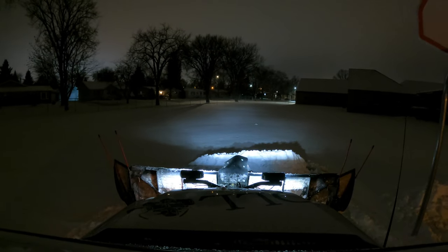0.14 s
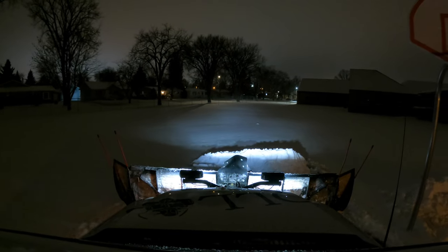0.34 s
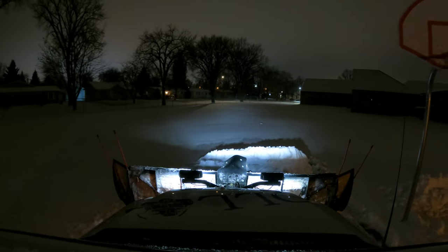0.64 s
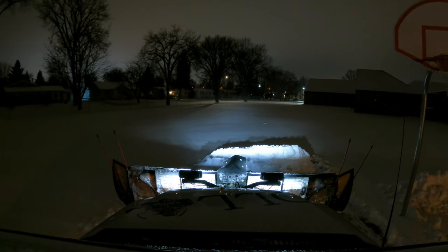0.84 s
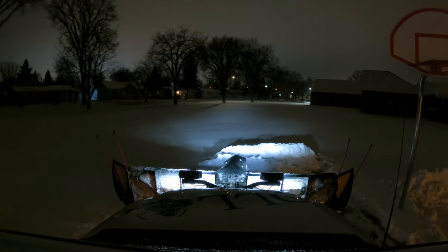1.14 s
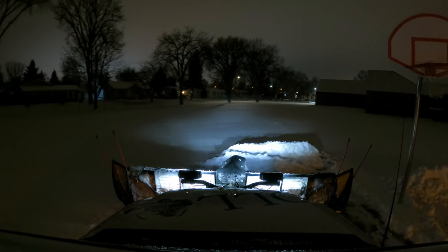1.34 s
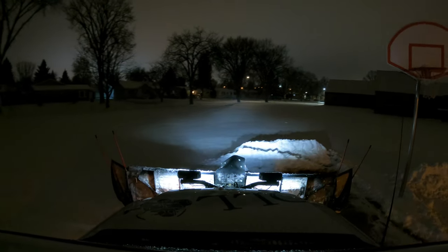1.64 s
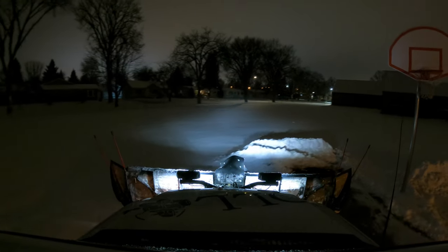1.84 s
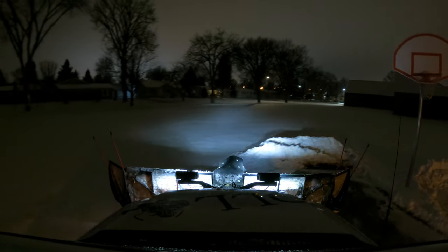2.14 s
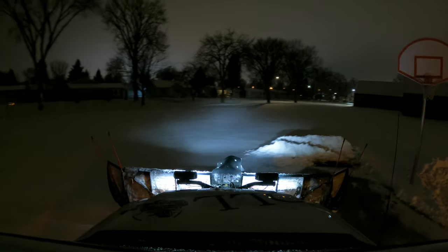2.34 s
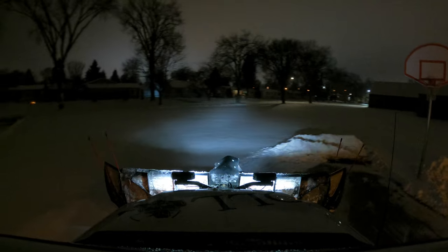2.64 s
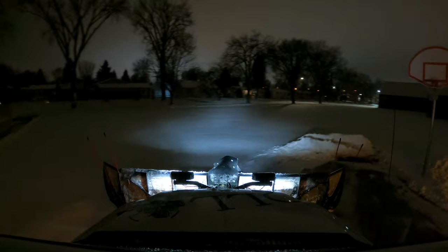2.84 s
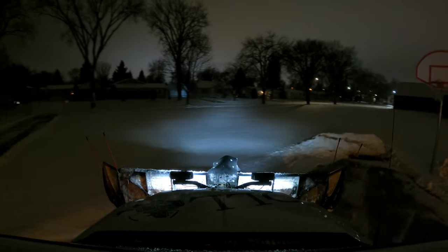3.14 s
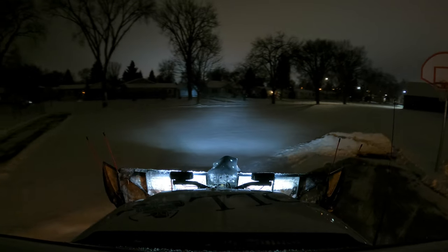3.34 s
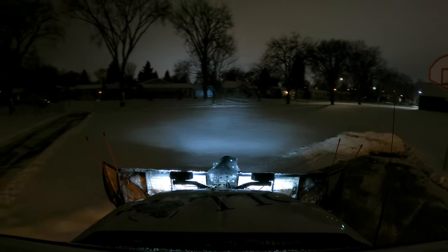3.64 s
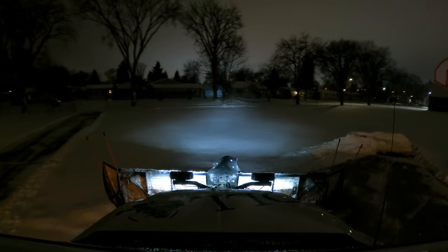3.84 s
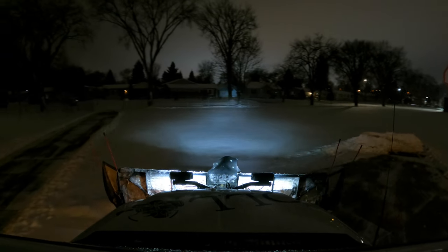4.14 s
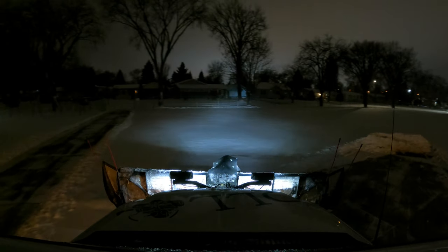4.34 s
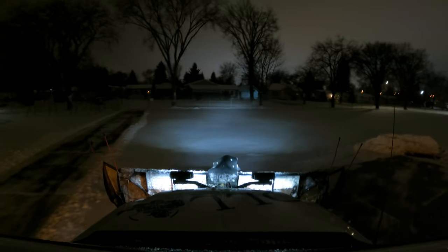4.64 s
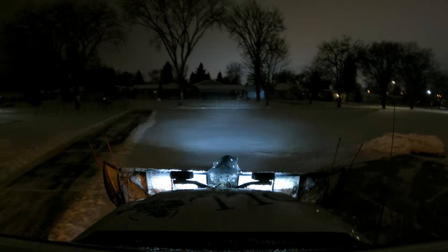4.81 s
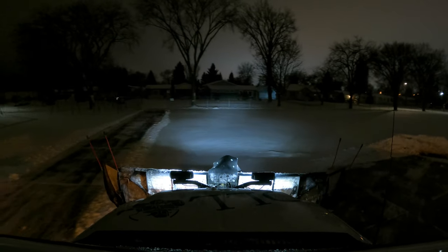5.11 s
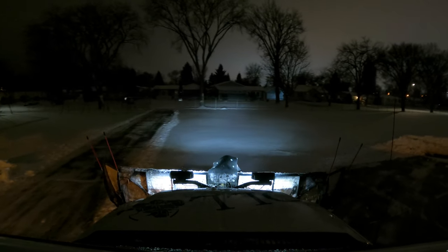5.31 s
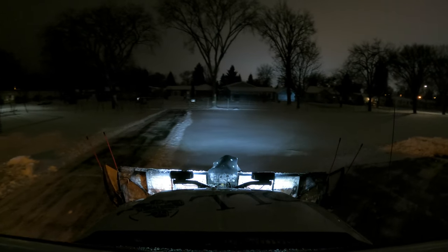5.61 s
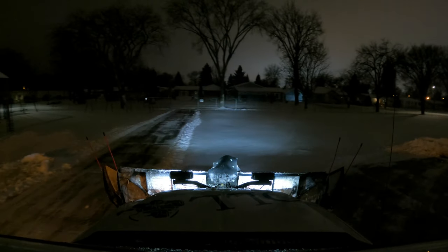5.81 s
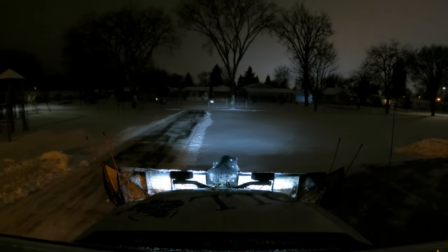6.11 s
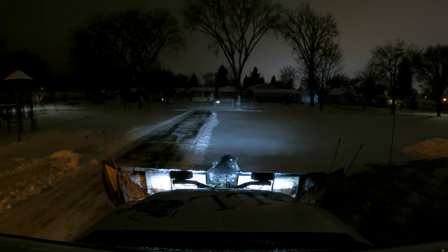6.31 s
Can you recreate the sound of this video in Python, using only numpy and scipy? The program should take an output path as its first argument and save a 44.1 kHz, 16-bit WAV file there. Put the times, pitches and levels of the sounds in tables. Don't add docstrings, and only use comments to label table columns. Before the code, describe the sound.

Close on the cab roof of a V8 diesel pickup plowing an open snowy lot, a deep exhaust boom and rough, uneven clatter run throughout. A thin turbo whistle climbs with the revs, peaks near two seconds and sinks away. The engine then slows and lurches, with thuds through the frame, a revving surge around five seconds, and a last dip and pickup. Soft hiss of snow and air fills the gaps.

```python
import sys
import numpy as np
from scipy import signal
from scipy.fft import rfft, irfft, next_fast_len
from scipy.io import wavfile

SR = 44100
rng = np.random.default_rng(int(sys.argv[2]) if len(sys.argv) > 2 else 0)


def natural_amplitude(level_db):
    exponent = np.asarray(level_db, float) / 20
    return 10 ** exponent


def output_pcm(signal):
    pcm = np.clip(np.atleast_2d(signal).T, -1, 1) * 32767
    wavfile.write(sys.argv[1], SR, np.round(pcm).astype(np.int16))


N = 285327
HZ = np.fft.rfftfreq(next_fast_len(N, True), 1 / SR) + 1e-3

# (frequency [Hz], width [Hz], level over the base [dB])
PIPE_MODES = [(41.8, 4.6, 5), (45.44, 1.33, -11), (54.3, 30.4, 21.5), (93.3, 15.6, 6), (122.8, 15.3, 16),
              (171.4, 10, 8), (226.4, 5.6, 8.5), (267, 36, -4.5)]
ORDER_LEVELS = [0.0, 2, -4.5, -5]
ORDER_LEADS = [0.07, 1.76, 1.36, 0.89]
# (frequency [Hz], level [dB per Hz])
CAB_SPECTRUM = [(8, -43), (18, -14), (26, -3), (40, -10.5), (70, -0.5), (110, 0), (150, -6), (200, -6),
                (225, -10.5), (255, -33), (330, -65.5)]
# (frequency [Hz], width [Hz], level [dB])
CAB_MODES = [(92.5, 5.8, -12.5), (187, 180, 4), (190, 6.4, 3.5),
             (54, 14, 8), (126.8, 16.4, 3)]


def exhaust(rate, firings, effort_db):
    turn = 2 * np.pi * (firings - .15)
    first_db, upper_db, rumble_swell_db = swells_and_lulls()
    orders = 0
    for order, (order_db, lead) in enumerate(zip(ORDER_LEVELS, ORDER_LEADS), 1):
        humps_db = sum(db / (1 + (2 * (order * rate - hz) / width) ** 2) for hz, width, db in PIPE_MODES)
        swell_db = upper_db if order > 1 else first_db
        orders = orders + natural_amplitude(order_db + humps_db + swell_db) * np.sin(order * turn + lead)
    orders = orders * natural_amplitude(-40.5 + 0.27 * effort_db)
    rumble_db = rumble_swell_db - 29 + 0.3 * effort_db + 0.06 * (rate - rate.mean())
    cab_gain = colour(CAB_SPECTRUM, CAB_MODES)
    mid, side = rms_one(filtered(rng.standard_normal((2, N)), cab_gain))
    return np.sqrt(2) * orders + natural_amplitude(rumble_db) * (mid + natural_amplitude(-26.0) * side * [[1], [-1]])


# (time [s], length [s], first order [dB], upper orders [dB], rumble [dB])
SWELLS_AND_LULLS = [(0.62, 0.57, 2, 2, 2.5), (1.623, 0.28, -1.5, -13.5, 3.5), (2.154, 0.15, -5.5, -5.5, 2),
                    (2.41, 0.45, 3, 3.5, 5), (2.495, 0.064, -2, 1, -5), (1.75, 0.14, -0.5, 13.5, 1.5),
                    (1.185, 0.53, -0.5, 1, 1), (3.44, 0.3, 2, 3.5, 1.5), (3.814, 0.27, 3, -5.5, 2),
                    (4.08, 0.075, -22, -4, -2), (4.236, 0.076, 2.5, -11, 1.5), (4.45, 0.48, -3, -7.5, 0.5),
                    (4.9, 0.094, -2, 3, 0.5), (5.79, 0.063, -4, -7.5, -17.5), (6.24, 0.16, 4, 7, -3.5),
                    (6.47, 0.15, -10.5, -22, 6.5), (0.13, 0.19, 0.5, 1, 0), (2.04, .1, 3.5, 4, -0.5),
                    (3.2, 0.062, -4.5, 1.5, 3), (4.42, 0.3, -3, 4.5, -2.5), (5.27, 0.34, 0.5, -5, 4),
                    (6.37, 0.079, 14, -8, 4), (1.52, 0.083, 1.5, 2.5, 0.5), (4.0, .1, 4, 2, 2.5),
                    (4.97, .1, 4.5, -3, 1.5), (3.87, 0.083, -1, 0, -4.5), (5.2, 0.088, 0, 3, 1),
                    (4.1, .1, 3, -6, -2.5)]


def swells_and_lulls():
    t = np.arange(N) / SR
    return sum(np.outer(db, np.exp(-(2 * (t - s) / length) ** 2 / 2)) for s, length, *db in SWELLS_AND_LULLS)


# (head [dB], sump [dB], covers [dB], block [dB], injector [dB])
CYLINDER_KNOCK = [(1, 9.5, 0, 12, 17), (4.7, 6, -1, 5, 17), (7, 9.5, -6, 7.5, 10), (1.5, -1, -1, 9, 18),
                  (-11, -25, -4.5, 8.5, 12.5), (-4.5, -33, -5.5, 11, 14), (3.5, -18, -2.5, 4.5, 10.5),
                  (4.5, -5.5, -3, 10, 11)]
BAND_EDGES = [150, 450, 930, 1100, 1700, 2500, 3600, 4700, 6200, 8500, 16000]
PART_OF_BAND = [0, 0, 1, 2, 3, 3, 2, 4, 4, 4]
# (frequency [Hz], level [dB], decay t60 [s])
BAND_RINGS = [(300, -26, 0.041), (607, -42.5, 0.04), (1047, -26.5, 0.027), (1405, -35, 0.52),
              (1977, -43.5, 0.032), (2850, -35, 0.012), (4170, -25, 0.014), (5200, -35, 0.013),
              (6800, -27, 0.024), (8750, -15.5, 0.0063)]
# (frequency [Hz], level [dB per Hz])
BAY_SPECTRUM = [(150, -51), (240, -4.5), (300, -1), (400, -4), (600, -2.5), (1050, -3.5), (1750, -6.5),
                (2850, -7.5), (3550, -12.5), (5250, -15), (7000, -14.5), (10100, -37.5), (12500, -54.5),
                (15500, -91)]
# (frequency [Hz], width [Hz], level [dB])
BLOCK_MODES = [(573, 7.1, 5.5), (813, 30, 5.5), (1010, 150, 4.5), (1197, 170, 4), (1384, 24, 6),
               (1531, 45, 6), (2110, 18, 2.5), (2850, 230, 2), (3060, 560, 2.5), (5290, 210, 4.5),
               (7080, 360, -3.5), (856, 93, -8), (6160, 1100, -7.5)]


def clatter(rate, firings, level_db, treble_db, knock):
    at = np.flatnonzero(np.diff(np.floor(firings))) + 1
    cylinder = np.floor(firings).astype(int) % 8
    since = np.arange(N) - np.r_[0, at][np.searchsorted(at, np.arange(N), "right")]
    hiss, fresh = rng.standard_normal((2, 2, N))
    own_rattle = rng.standard_normal((2, 8, 2000))[:, cylinder, since]
    rattle = 0.55 * own_rattle + 0.8 * fresh
    common_db = 0.61 * rng.standard_normal(400)[:len(at)]
    knock = np.clip(knock, 0, .9)
    patterns = np.transpose(CYLINDER_KNOCK)[PART_OF_BAND]
    out = 0
    for low, high, pattern_db, (ring_hz, ring_db, ring_t60) in zip(BAND_EDGES, BAND_EDGES[1:], patterns, BAND_RINGS):
        kicks = np.zeros(N)
        spread_db = 1.3 * rng.standard_normal(400)[:len(at)]
        kicks[at] = natural_amplitude(np.array(pattern_db)[cylinder[at]] + common_db + spread_db)
        bursts = rms_one(one_pole(one_pole(kicks, .0058), .007))
        share = knock * min(1, (low / 1700) ** 0.56, (6000 / low) ** 0.15)
        octaves_up = np.log2(low / 2500)
        bright_db = (treble_db - treble_db.mean()) * np.clip(octaves_up, 0, 1)
        tilt = natural_amplitude(bright_db + (-0.08 + 0.46 * np.clip(octaves_up, 0, 2)) * drift(8.2))
        tilt *= (rate / 50) ** (1.8 * np.clip(np.log2(600 / low), 0, 1))
        mix = tilt * (np.sqrt(1 - share) * hiss + np.sqrt(share) * bursts * rattle)
        mix[0] += tilt * np.sqrt(0.37 + 0.68 * knock) * natural_amplitude(ring_db) * ring(kicks, ring_hz, ring_t60)
        out = out + filtered(mix, (HZ >= low) & (HZ < high))
    return natural_amplitude(level_db + 1.93) * ports(filtered(out, colour(BAY_SPECTRUM, BLOCK_MODES)))


def ring(clicks, hz, t60):
    w = 2 * np.pi * hz / SR
    decay = natural_amplitude(-60 / (max(t60, .003) * SR))
    swell = np.exp(-1 / (.0015 * SR))
    for pole in (decay, swell):
        clicks = signal.lfilter([0, np.sin(w)], [1, -2 * pole * np.cos(w), pole * pole], clicks + 1e-18)
    return rms_one(clicks)


# (frequency [Hz], level [dB]) of three modes
CYLINDER_MODES = [(1040, 4, 2775, 7.5, 1450, 3), (1470, 5, 2760, 7, 1110, 5), (1060, 3, 2800, 5.5, 600, 3),
                  (1356, 7.5, 2890, 5, 1140, 2), (1470, 7, 2760, 1, 2420, 1), (1357, 3, 2935, 6, 2690, 6),
                  (1740, -3, 2995, 9, 645, 0), (1055, 0, 2950, 7, 2133, 4)]
MODE_DECAYS = [0.086, 0.049, 0.029]


def own_rings(knocks, level_db):
    burn = np.floor(knocks).astype(int)
    chance = rng.standard_normal((400, 6))[burn - burn[0]].T
    age = (np.arange(N) - np.searchsorted(burn, burn)) / SR
    modes = np.transpose(CYLINDER_MODES)[:, burn % 8]
    rise = (1 - np.exp(-age / .003)) ** 2
    fade = np.minimum(5 * (1 - knocks % 1), 1)
    out = 0
    for hz, db, t60, loud, pitch in zip(modes[::2], modes[1::2], MODE_DECAYS, chance[:3], chance[3:]):
        shape = rms_one(natural_amplitude(-60 * age / t60) * rise * fade)
        out = out + 4 * shape * natural_amplitude(db + 1.3 * loud) * np.sin(2 * np.pi * hz * (1 + .009 * pitch) * age)
    return natural_amplitude(level_db - 8) * ports([out, 0 * out])


# (time [s], frequency [Hz], extra level [dB])
GAS_MODE = [(0, 5290, -4.5), (2.3, 5290, -2.5), (2.45, 5060, -2), (3.2, 5130, 0), (3.6, 5290, 1.5),
            (3.96, 5060, -5), (4.43, 5270, 1.5), (4.8, 5090, 1), (4.9, 5525, 5), (5.1, 5420, 4.5),
            (5.35, 5280, -3), (5.6, 5070, 0), (5.85, 5200, -4.5), (6.47, 5200, 5)]
GAS_OF_CYLINDER = [0.5, 2, 2.5, -8, -2.5, -3.5, 2, -19.5]


def chamber(rate, knocks, effort_db):
    burn = (np.floor(knocks) - np.floor(knocks[0])).astype(int)
    chance = rng.standard_normal((400, 2))
    hz, extra_db = in_time(GAS_MODE)
    turn = 2 * np.pi * np.cumsum(hz + 90 * chance[burn, 0] + 220 * drift(300)) / SR
    age = knocks % 1
    own_db = np.array(GAS_OF_CYLINDER)[np.floor(knocks).astype(int) % 8]
    flare = 75 * age ** 2 * np.exp(-7 * age)
    gas_db = -44 + extra_db + own_db + 0.43 * effort_db + 2.5 * chance[burn, 1]
    gas = natural_amplitude(gas_db) * flare * np.sin(turn)
    return gas.std() * ports([gas, 0 * gas])


# (time [s], frequency [Hz], level [dB])
WHISTLE = [(0, 3537, -66), (.3, 3610, -60), (.5, 3680, -56), (.9, 3790, -52), (1.2, 3930, -50),
           (1.5, 4080, -47.5), (1.74, 4200, -47), (1.87, 4310, -40.5), (2.0, 4420, -41.5),
           (2.25, 4570, -47.5), (2.44, 4505, -46), (2.55, 4440, -50.5), (2.8, 4230, -53), (3.0, 4090, -52),
           (3.2, 3960, -55), (3.35, 3860, -61), (3.5, 3760, -63), (4.2, 3410, -72)]


def turbo(firings):
    hz, level_db = in_time(WHISTLE)
    flutter_db = one_pole(np.where(np.gradient(hz) > 0, -6, -12), .05)
    turn = 2 * np.pi * np.cumsum(hz * (1 + .003 * drift(28.5))) / SR
    pure = np.sin(turn) * natural_amplitude(2.4 * drift(30))
    below_db = 1 + 2 * drift(6.2) + np.minimum(level_db + 51, 0)
    below = natural_amplitude(below_db) * np.sin(turn - 4 * np.pi * firings)
    above = natural_amplitude(-5 + 3 * drift(8)) * np.sin(turn + 4 * np.pi * firings)
    skirt = (drift(89) + 1j * drift(180)) * np.exp(1j * (.985 * turn))
    return np.sqrt(2) * natural_amplitude(level_db) * (pure + natural_amplitude(flutter_db) * (below + above + 1.56 * skirt.real))


# (time [s], frequency [Hz], level [dB])
FAN_WHINE = [(0, 786, -48.5), (.72, 782, -48), (.79, 770, -58), (.86, 768, -48), (1.3, 800, -47.5),
             (1.5, 800, -60), (1.62, 750, -56), (1.8, 765, -53), (2.4, 755, -54), (2.6, 770, -66),
             (6.47, 785, -70)]


def fan():
    return rough_tone(*in_time(FAN_WHINE), wander_hz=2.5, flicker_db=1.0, speed=10.0)


# (time [s], frequency [Hz], level [dB])
ROOF_DRUMMING = [(0, 92, -32), (.2, 92, -29.5), (.8, 92, -29.5), (1.1, 93, -37), (1.5, 93.5, -33),
                 (1.85, 95.5, -29), (2.1, 97, -29), (2.35, 96, -40), (2.6, 94, -55), (4.5, 91, -50),
                 (4.85, 92, -33), (5.15, 94, -31), (5.28, 94, -40), (5.5, 95, -32), (5.75, 92, -36),
                 (5.9, 92, -55), (6.47, 92, -55)]


def panel():
    return rough_tone(*in_time(ROOF_DRUMMING), wander_hz=.6, flicker_db=.7, speed=3.0)


def rough_tone(hz, level_db, wander_hz, flicker_db, speed):
    turn = 2 * np.pi * np.cumsum(hz + wander_hz * drift(speed)) / SR
    return np.sqrt(2) * natural_amplitude(level_db + flicker_db * drift(speed)) * np.sin(turn)


# (time [s], peak level [dB], frequency [Hz], decay t60 [s])
JOLTS = [
    (3.49, -19, 131, 0.24),
    (4.528, -21, 119, 0.19),
    (4.604, -12, 53.4, 0.26),
    (4.919, -18.5, 117, 0.39),
    (6.035, -20.5, 330, 0.071),
    (6.36, -27, 70, 0.22),
]


def bumps():
    t, out = np.arange(N) / SR, 0
    for s, db, hz, t60 in JOLTS:
        age = np.maximum(t - s, 0)
        out = out + natural_amplitude(db - 60 * age / t60) * np.sin(2 * np.pi * hz * age) * np.minimum(age / 0.00095, 1)
    return out


# (frequency [Hz], left-right likeness [0-1])
PORT_LIKENESS = [(60, 1.0), (260, .99), (530, .96), (1100, .94), (2270, .96), (3800, .68), (5800, .78),
                 (8500, .82), (11000, .7)]
# (frequency [Hz], left minus right [dB])
PORT_LEVEL = [(190, 0), (330, -.5), (570, -2.2), (1010, -2.5), (1780, -2), (3130, -1), (5500, -1.2),
              (7000, 0)]
# (frequency [Hz], lead of the left [rad])
PORT_LEAD = [(0, 0.76), (1810, -0.35), (3100, -0.93), (5510, -0.3), (9820, -1.2)]


def ports(pair):
    mid, side = pair
    alike = np.clip(at_hz(PORT_LIKENESS), 0, 1)
    skew = natural_amplitude(at_hz(PORT_LEVEL) / 2) * np.exp(.5j * at_hz(PORT_LEAD))
    mid, side = filtered(mid, np.sqrt(1 + alike)), filtered(side, np.sqrt(1 - alike))
    return rms_one(filtered(np.array([mid + side, mid - side]), np.array([skew, 1 / skew])))


def rms_one(x):
    return x / np.sqrt(np.mean(x ** 2) + 1e-20)


def in_time(rows):
    s, *columns = np.transpose(rows)
    return [np.interp(np.arange(N) / SR, s, c) for c in columns]


def at_hz(points):
    hz, value = np.transpose(points)
    return np.interp(np.log(HZ), np.log(np.maximum(hz, 1)), value)


def colour(spectrum, modes):
    humps_db = sum(db / (1 + (2 * (HZ - hz) / width) ** 2) for hz, width, db in modes)
    return natural_amplitude(at_hz(spectrum) + humps_db)


def filtered(x, gain):
    size = next_fast_len(N, True)
    return irfft(rfft(x, size) * gain, size)[..., :N]


def drift(rate):
    r = np.exp(-80 * np.pi * rate / SR)
    slow = signal.lfilter([1], [1, -2 * r, r * r], rng.standard_normal(N // 40 + 2002))[2000:]
    return np.interp(np.arange(N) / 40, np.arange(len(slow)), rms_one(slow))


def one_pole(x, seconds):
    r = np.exp(-1 / (max(seconds, 1e-4) * SR))
    return signal.lfilter([1 - r], [1, -r], x)


# (time [s], rate [firings per s])
FIRING_RATE = [(0.0, 55.98), (0.7, 55.93), (0.94, 59.46), (1.66, 63.03), (2.0, 70.77), (2.35, 64.2),
               (2.63, 51.44), (2.91, 46.74), (3.32, 45.0), (3.83, 51.3), (4.14, 42.13), (4.44, 43.62),
               (4.84, 40.78), (5.23, 56.73), (5.4, 56.2), (5.73, 43.54), (6.04, 40.63), (6.47, 47.1)]
# (time [s], clatter level [dB], brightness [dB])
ENGINE_EFFORT = [(0, -33, -17.5), (.1, -35.5, -14), (.85, -35.5, -14), (2.0, -33, -12), (2.33, -32, -11),
                 (2.55, -35.5, -11), (3.25, -33, -11.5), (3.4, -31, -12), (3.65, -31.5, -12.5),
                 (4.07, -36, -11), (4.15, -33, -13), (4.22, -31, -13), (4.43, -32.5, -10.5),
                 (4.82, -31, -12.5), (4.93, -28.5, -12), (5.02, -30.5, -12), (5.11, -30.5, -11.5),
                 (5.45, -35.5, -12), (5.7, -35, -11.5), (6.07, -31, -13), (6.47, -34, -13)]


def scene():
    rate, = in_time(FIRING_RATE)
    level_db, treble_db = in_time(ENGINE_EFFORT)
    effort_db = level_db - level_db.mean()
    firings = np.cumsum(rate) / SR
    pipe_delay_s = .035
    knocks = firings + pipe_delay_s * rate - 1.8
    knock_share = 0.69 - 0.012 * (rate - 48)
    engine = exhaust(rate, firings, effort_db) + clatter(rate, knocks, level_db, treble_db, knock_share)
    engine = engine + own_rings(knocks, level_db) + chamber(rate, knocks, effort_db)
    whines = (turbo(firings) + fan()) * natural_amplitude(np.array([[-.8], [.8]]))
    return engine + whines + panel() + bumps()


# (low edge [Hz], chance of inversion [0-1], chance in a spell [0-1], depth [0-1])
POLARITY_BANDS = [(6288, .4, .7, .17), (6891, 0, .03, .3), (7580, 0, .7, 1), (8269, .01, .7, 1),
                  (8958, .03, .8, 1), (9647, .07, .15, 1), (10336, .13, .2, .9), (11025, .18, .25, .9),
                  (11714, .14, .14, .8), (12403, .03, .03, .8), (13092, 0, 0, 0)]
# (time [s], length [s], lowest frequency [Hz])
INVERSION_SPELLS = [(.24, .06, 7500), (.4, .12, 7500), (.6, .05, 8200), (.7, .14, 7900), (.86, .3, 8900),
                    (1.5, .08, 7500), (1.58, .08, 8200), (1.72, .2, 8900), (1.98, .1, 8200), (2.08, .12, 7500),
                    (2.32, .13, 8200), (2.62, .07, 8900), (3.08, .12, 8200), (3.3, .12, 8900), (3.3, .05, 7500),
                    (3.47, .38, 8900), (3.6, .14, 7500), (3.97, .07, 8900), (4.1, .09, 8900), (4.48, .06, 8200),
                    (4.86, .07, 8900), (5.2, .07, 7900), (5.45, .05, 8900), (5.8, .05, 7500), (5.88, .14, 8900)]


def joint_treble(x):
    centres = np.arange(360, N + 1024, 1024)
    edges = np.transpose(POLARITY_BANDS)[0]
    left, right = x[0], filtered(x[1], HZ < edges[0])
    for (low, chance, spell_chance, depth), high in zip(POLARITY_BANDS, np.r_[edges[1:], SR]):
        spell = np.zeros(len(centres), bool)
        for s, length, lowest in INVERSION_SPELLS:
            spell |= (centres / SR > s) & (centres / SR < s + length) & (low > lowest)
        flip = rng.random(len(centres)) < np.where(spell, spell_chance, chance)
        polarity = np.interp(np.arange(N), centres, 1 - 2 * depth * flip)
        right = right + filtered(left, (HZ >= low) & (HZ < high)) * polarity
    return np.array([left, right])


def low_pass(x):
    return signal.sosfilt(signal.butter(12, 15400, fs=SR, output="sos"), x)


def record(dry):
    top = .5
    mix = joint_treble(top * np.tanh(dry / top))
    return low_pass(mix)


dry = scene()
out = record(dry)
output_pcm(out)
```